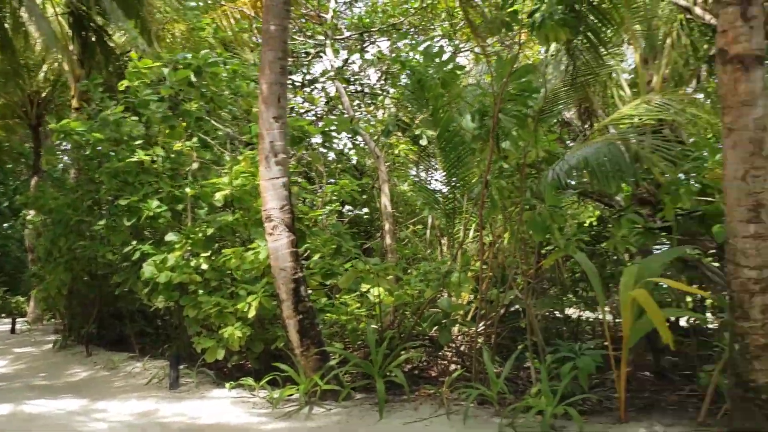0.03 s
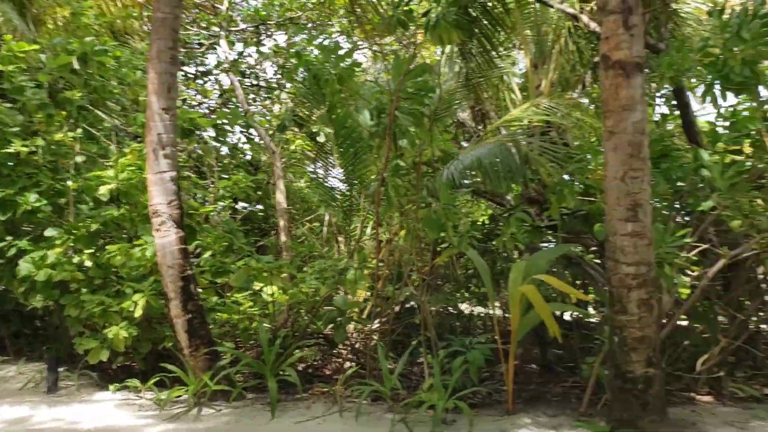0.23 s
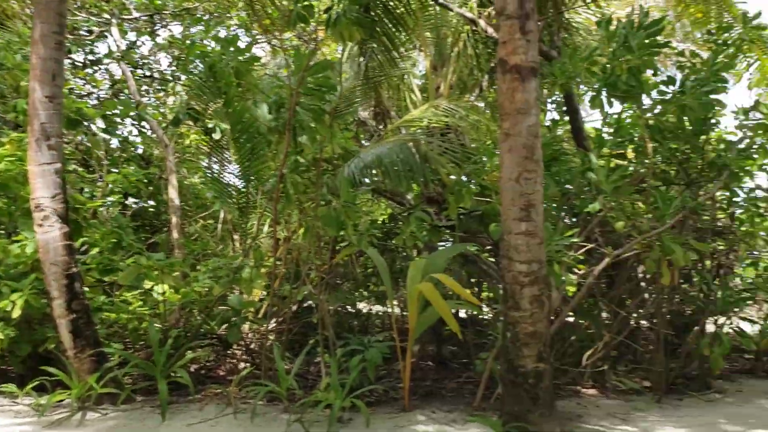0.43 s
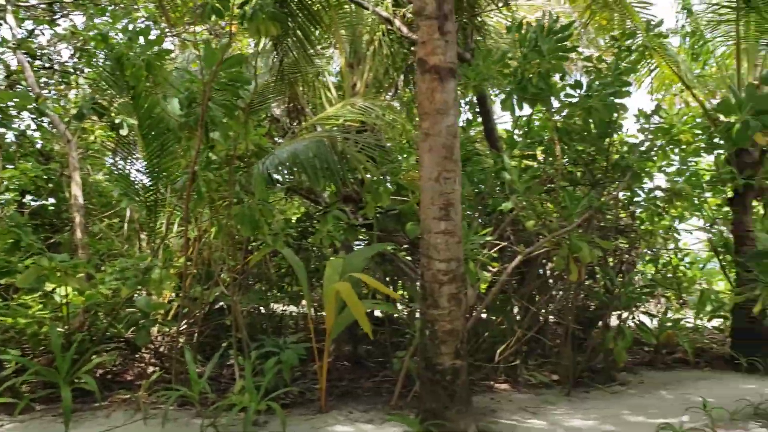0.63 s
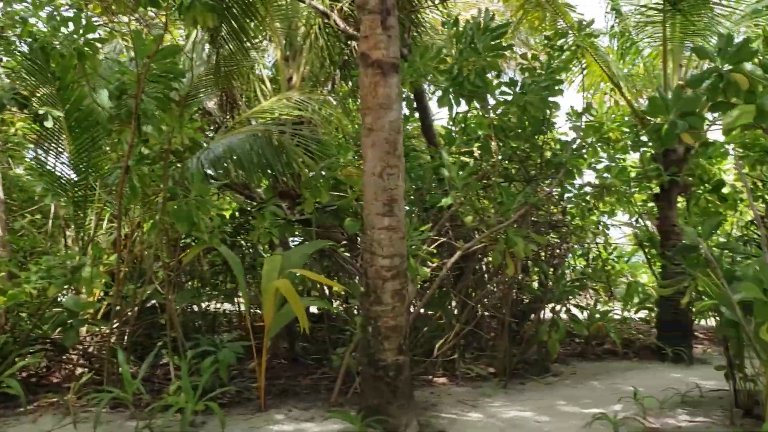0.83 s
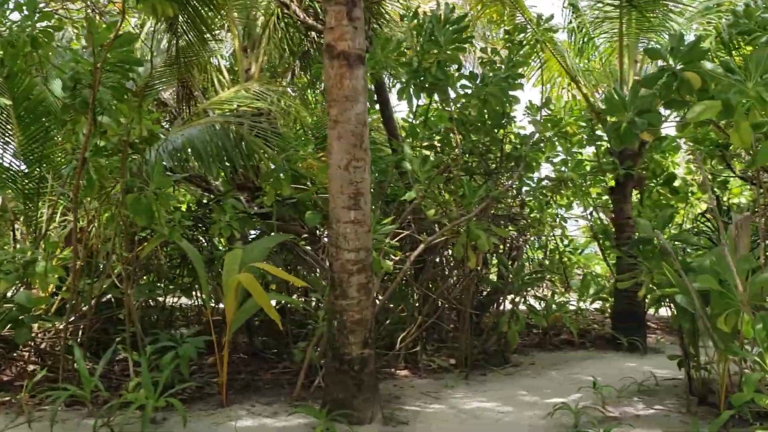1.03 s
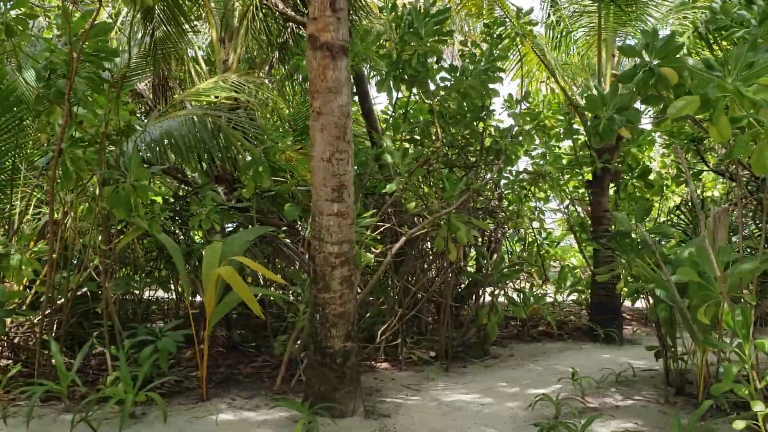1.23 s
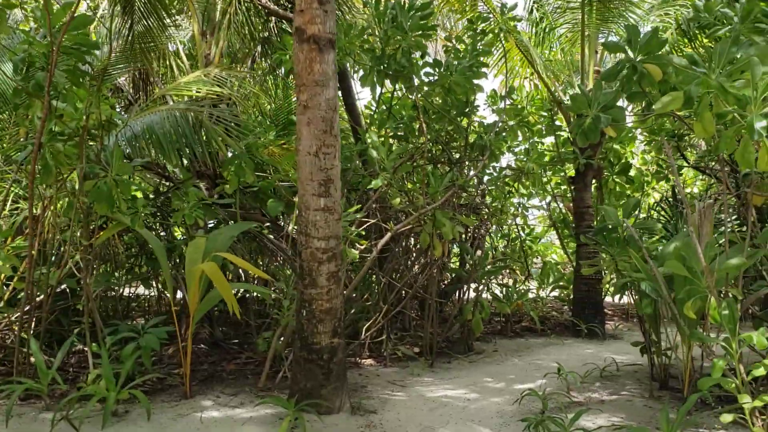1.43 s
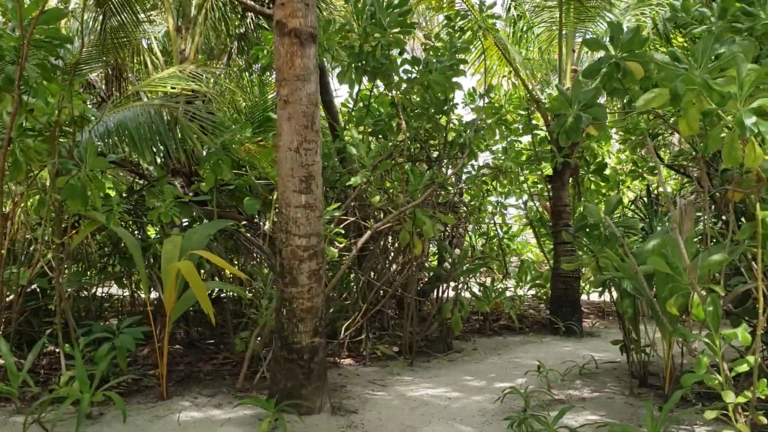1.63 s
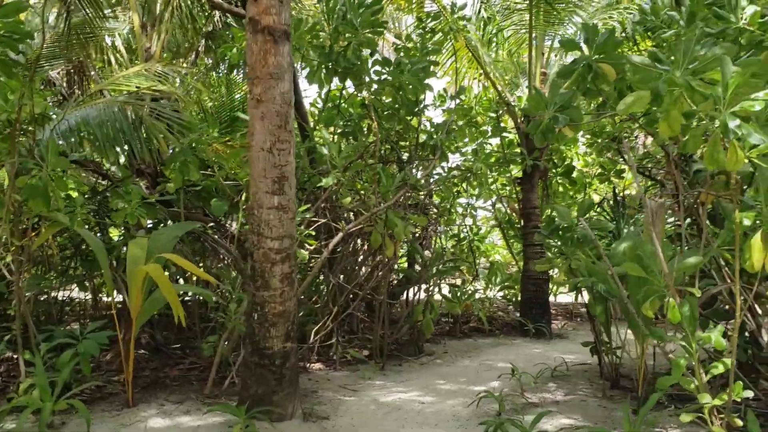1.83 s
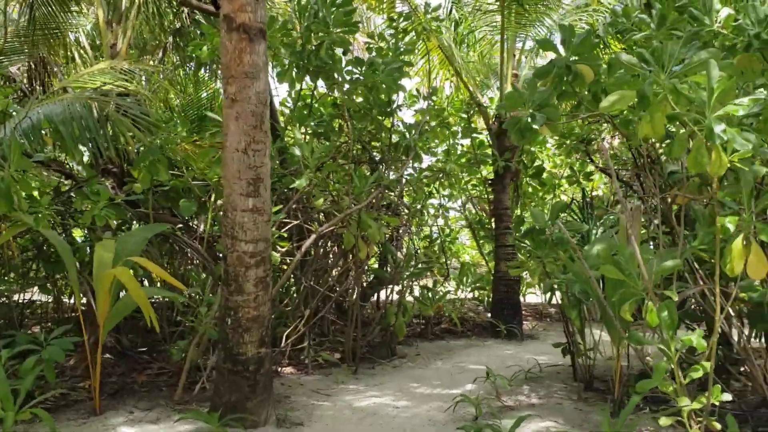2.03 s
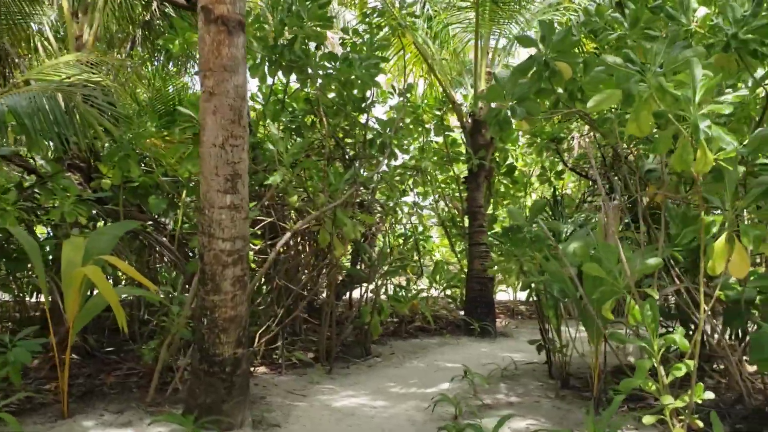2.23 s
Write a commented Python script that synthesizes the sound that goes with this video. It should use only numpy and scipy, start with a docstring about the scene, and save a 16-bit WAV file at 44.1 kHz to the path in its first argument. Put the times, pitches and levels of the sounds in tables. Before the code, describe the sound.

Leaves rustle in a steady wind among palms and bushes, with distant trees rushing softly behind. Low buffeting hits the microphone, peaks briefly, then turns to lighter thumps as the rustling grows a little quieter.

```python
"""A breeze hisses through palm fronds and shrubs in a tropical garden: countless leaves brush and patter,
and far trees rush softly. From the start the same air rumbles on the microphone's two openings (ports),
and small whirls of air (eddies) thump on them. Around 0.7 seconds the strongest eddies hit the left port
while the hiss eases a step. Lighter thumps follow. Just after 2 seconds the hiss eases a second step
and the rumble drops too."""
import sys
import numpy as np
from scipy import signal
from scipy.fft import irfft
from scipy.io import wavfile
from scipy.ndimage import uniform_filter1d

SR = 44100
rng = np.random.default_rng(int(sys.argv[2]) if len(sys.argv) > 2 else 0)


def pcm_store(signal):
    """Save signal as 16-bit PCM."""
    levels = np.round(np.clip(np.atleast_2d(signal), -1, 1) * 32767)
    wavfile.write(sys.argv[1], SR, levels.astype(np.int16).T)


N = 101429
TIME = np.arange(N) / SR

# How the leaf hiss eases. Each row: time in seconds, then relative levels in dB of middle and treble.
HISS_LEVELS = [(0, -49.3, -51.6), (.12, -50.4, -51.3), (.57, -50.3, -52.7), (.73, -53.7, -55),
               (1.45, -53.6, -55.4), (2.04, -53, -54.8), (2.06, -56.2, -57.8), (2.14, -57.8, -58),
               (2.3, -56.2, -57.8)]
# The tone of the leaves. Each row: frequency in Hz, relative level in dB.
LEAF_TONE = [(850, -1.5), (1400, -0.5), (2000, -1), (2600, -2.5), (3600, -0.5), (4700, -2), (5900, -2),
             (7400, -3), (8150, -7.5), (9200, -9), (10200, -8), (11700, -7), (13000, -6.5), (14300, -9),
             (15500, -4.5)]


def from_db(db):
    """Turn decibels into a number to multiply a sound by."""
    return 10 ** (np.asarray(db) / 20)


def rms_one(x):
    """Scale a signal so that its average size (root mean square) is 1."""
    return x / np.sqrt(np.mean(x ** 2) + 1e-20)


def in_time(rows):
    """Turn rows that start with a time into one curve for each other column."""
    times, *columns = np.transpose(rows)
    return np.array([np.interp(TIME, times, column) for column in columns])


def at_hz(rows, hz):
    """Read a table's value at one frequency, with octaves evenly spaced."""
    frequencies, values = np.transpose(rows)
    return np.interp(np.log(hz), np.log(frequencies), values)


def drift(rate_hz):
    """A slow random wobble, about 1 in size."""
    step, warm_up = 40, 2000   # one point every 40 samples; the first points are dropped
    pole = np.exp(-2 * np.pi * rate_hz * step / SR)
    noise = rng.standard_normal(N // step + warm_up + 2)
    slow = signal.lfilter([1], [1, -2 * pole, pole * pole], noise)[warm_up:]
    return np.interp(np.arange(N) / step, np.arange(len(slow)), rms_one(slow))


def bands(low_hz, high_hz, count):
    """Noise in side-by-side bands. Each gives its centre in Hz and two unrelated noises."""
    edges = np.geomspace(low_hz, high_hz, count + 1)
    bank = []
    for low, high in zip(edges, edges[1:]):
        band_pass = signal.butter(2, [low, high], "band", fs=SR, output="sos")
        pair = signal.sosfilt(band_pass, rng.standard_normal((2, N + SR // 4)))[:, -N:]
        bank.append((np.sqrt(low * high), pair))
    return bank


def far_trees(likeness=0.8, left_delay_s=0.00032, left_db=0.5):
    """Wind rushes dully in far treetops. They stand to the right, so the left port hears them later."""
    # The tone of the rush. Each row: frequency in Hz, relative level in dB.
    tone = [(150, -17), (280, 3.5), (400, -3), (560, -4), (800, -6.5), (1200, -17.5), (2000, -17)]
    # How loud the rush is. Each row: time in seconds, level in dB.
    levels = [(0, -46.5), (.55, -47.5), (.8, -52), (2.0, -49.5), (2.08, -52), (2.3, -52.5)]
    common, apart = sum(pair * from_db(at_hz(tone, hz)) for hz, pair in bands(120, 2200, count=14))
    common, apart = np.sqrt(1 + likeness) * common, np.sqrt(1 - likeness) * apart
    left = from_db(left_db) * np.interp(TIME - left_delay_s, TIME, common + apart)
    right = common - apart
    return from_db(in_time(levels)) * rms_one(np.array([left, right]))


def turbulence():
    """Churning air makes a separate low noise on each port, here evened out to a steady level."""
    # The tone of the churning air. Each row: frequency in Hz, relative level in dB.
    tone = [(22, -31), (38, -10.5), (58, 4), (85, -1.5), (120, -5), (180, -17), (280, -19.5), (450, -43.5),
            (900, -54)]
    noise = sum(pair * from_db(at_hz(tone, hz)) for hz, pair in bands(20, 1000, count=16))
    window = int(.05 * SR)
    power = uniform_filter1d(uniform_filter1d(noise ** 2, window), window)
    return rms_one(noise / np.sqrt(power + 1e-20))


def port_rumble(flutter_db=1, flutter_hz=7):
    """Air flowing over the ports rumbles, rising and falling with the flow and fluttering by chance."""
    # The airflow's rumble before flutter. Each row: time in seconds, left level in dB, right level in dB.
    airflow = [(0, -35.5, -34.5), (.14, -39.5, -40.5), (.25, -28, -40), (.3, -26, -34.5), (.56, -39.5, -32),
               (.63, -25.5, -33.5), (.79, -20.5, -32), (.83, -37.5, -30), (.95, -35, -35),
               (1.04, -36.5, -34), (1.28, -29.5, -33.5), (1.4, -37.5, -37.5), (1.56, -34.5, -33),
               (1.84, -37, -32), (2.02, -30.5, -38.5), (2.07, -47, -44.5), (2.18, -45, -49),
               (2.3, -39.5, -41)]
    flutter = np.array([drift(flutter_hz), drift(flutter_hz)])
    return from_db(in_time(airflow) + flutter_db * flutter) * turbulence()


def eddies(boost_db=0.5, steepness=4.67, core_ratio=2.14, wake_db=-16, wake_s=0.019):
    """Each eddy thumps a port with one quick swing of pressure, inside a brief wake of churning air."""
    # Eddies hitting the ports. Each row: time in seconds, relative strength in dB, pitch in Hz,
    # port (0 is left, 1 is right).
    hits = [(0.21, -25.5, 85, 0), (0.242, -21, 130, 0), (0.26, -18, 74, 0), (.299, -15, 94.5, 0),
            (.315, -20.5, 127, 0), (0.355, -23, 60.6, 0), (0.431, -22, 84, 0), (0.454, -16, 73, 0),
            (0.503, -14.5, 85, 0), (0.628, -17, 96, 0), (.644, -8.5, 139, 0), (0.669, -12, 140, 0),
            (0.684, -15.5, 131, 0), (0.713, -30, 70, 0), (0.737, -14, 141, 0), (0.751, -13, 76, 0),
            (0.763, -14, 90, 0), (0.787, -14, 80, 0), (1.006, -22, 84, 1), (1.033, -20, 90, 1),
            (1.196, -23, 85, 0), (1.265, -25, 153, 0), (1.33, -25, 98, 0), (1.451, -26, 75, 1),
            (1.567, -25, 74, 1), (1.814, -22.5, 135, 0), (1.841, -22, 61.3, 0), (1.93, -20.5, 131, 0),
            (1.943, -17, 145, 0), (1.958, -22, 145, 0), (1.979, -20, 115, 0), (2.011, -20.5, 102, 0),
            (2.099, -31.5, 150, 0), (2.209, -28, 101, 0), (2.28, -32.5, 99, 1)]
    out, churn = np.zeros((2, N)), turbulence()
    hz = np.arange(N // 2 + 1) * SR / N
    for (time_s, db, pitch_hz, port), phase in zip(hits, rng.random(len(hits))):
        strength, side = from_db(db + boost_db), int(port)
        body, core = [(hz / peak * np.exp(-hz / peak)) ** steepness
                      for peak in (pitch_hz, pitch_hz * core_ratio)]
        # Strong eddies get more of the quicker core, so they knock harder.
        spectrum = body / body.sum() + strength * core / core.sum()
        # The random phase gives each swing its own shape.
        swing = irfft(spectrum * np.exp(2j * np.pi * (phase - hz * time_s)), N) * N / 2
        wake = from_db(wake_db) * churn[side] * np.exp(-((TIME - time_s) / wake_s) ** 2)
        out[side] += strength * (swing + wake)
    return out


def all_round(pair, hz):
    """Mix two noises into left and right, so that the leaves seem to be all round."""
    # How alike the two sides are. Each row: frequency in Hz, likeness (0 is unrelated, 1 is the same).
    likeness = [(900, -0.23), (1500, -0.032), (2500, 0.087), (4000, -0.021)]
    alike = at_hz(likeness, hz)
    return np.sqrt(1 + alike) * pair[0] + np.sqrt(1 - alike) * pair[1] * np.array([[1], [-1]])


def lean(hz):
    """Left and right gains for the leaves: lower pitches lean left, the highest lean right."""
    # The full lean to one side. Each row: frequency in Hz, left level minus right level in dB.
    full_lean = [(900, 4.5), (1800, 2), (2600, 4.5), (4500, 3.5), (5800, 5), (7400, -0.5), (9000, -.8),
                 (10500, -2.5), (12000, -5.5), (15500, -4)]
    # How much of that lean is used. Each row: time in seconds, share from 0 to 1.
    shares = [(0, 0.76), (2.04, 0.85), (2.07, 0.18), (2.3, .2)]
    return from_db(np.array([[.5], [-.5]]) * at_hz(full_lean, hz) * in_time(shares))


def leaf_touches(touches_per_s=2500, spread_db=2, ring_cycles=4, relative_db=-13):
    """Nearer leaves tap each other on each side: tiny ticks that ring for a few cycles."""
    out, pitches = 0, np.geomspace(2000, 14000, 14)
    for hz in pitches:
        touches = rng.random((2, N)) < touches_per_s / len(pitches) / SR
        sizes = from_db(spread_db * np.minimum(rng.exponential(1, (2, N)), 5))
        taps = touches * sizes * rng.choice([-1, 1], (2, N))
        decay = np.exp(-np.log(1000) * hz / (ring_cycles * SR))   # fades 60 dB in ring_cycles
        angle = 2 * np.pi * hz / SR
        ticks = signal.lfilter([1, 0, -1], [1, -2 * decay * np.cos(angle), decay ** 2], taps + 1e-18)
        out = out + rms_one(ticks) * np.sqrt(hz) * from_db(at_hz(LEAF_TONE, hz)) * lean(hz)
    middle_db = in_time(HISS_LEVELS)[0]
    return from_db(middle_db + relative_db) * rms_one(out)


def leaf_hiss(middle_boost_db=3.5, treble_boost_db=4, treble_from_hz=9300, flicker_db=1.47):
    """Thousands of leaves brush together into a smooth hiss whose bands flicker a little."""
    middle_db, treble_db = in_time(HISS_LEVELS)
    middle, treble = 0, 0
    for hz, pair in bands(800, 17000, count=40):
        band_db = at_hz(LEAF_TONE, hz) + flicker_db * drift(rate_hz=9)
        band = all_round(pair, hz) * lean(hz) * from_db(band_db)
        if hz < treble_from_hz:
            middle = middle + band
        else:
            treble = treble + band
    middle = from_db(middle_db + middle_boost_db) * rms_one(middle)
    treble = from_db(treble_db + treble_boost_db) * rms_one(treble)
    return middle + treble


def scene():
    """Leaves all round, trees further off, and wind on the microphone."""
    return leaf_hiss() + leaf_touches() + far_trees() + port_rumble() + eddies()


def record(dry):
    """The microphone's right port rings a little; the deepest bass and highest treble are cut."""
    ring_hz, ring_width_hz, ring_gain = 11560, 350, 0.44
    left, right = dry
    ring = signal.lfilter(*signal.iirpeak(ring_hz, ring_hz / ring_width_hz, fs=SR), right)
    ports = np.array([left, right + ring_gain * ring])
    bass_cut = signal.butter(2, 30, "high", fs=SR, output="sos")
    treble_cut = signal.ellip(12, .1, 80, 15750, fs=SR, output="sos")
    return signal.sosfilt(treble_cut, signal.sosfilt(bass_cut, ports))


dry = scene()
out = record(dry)
pcm_store(out)
```